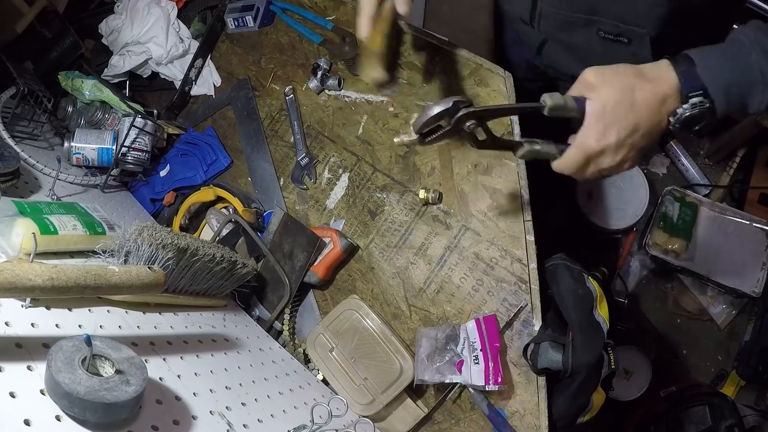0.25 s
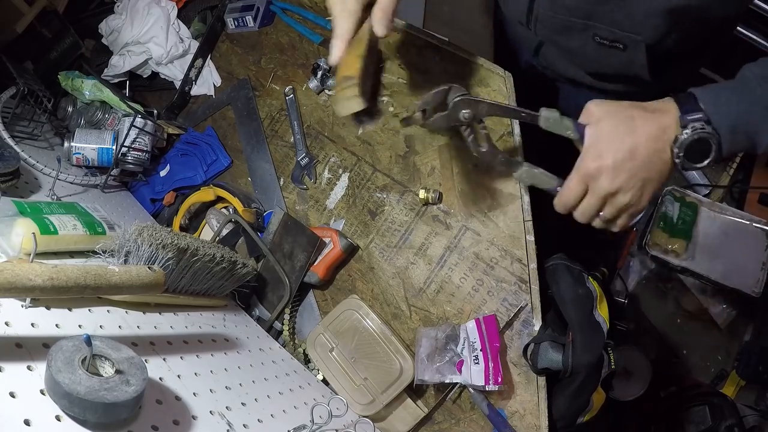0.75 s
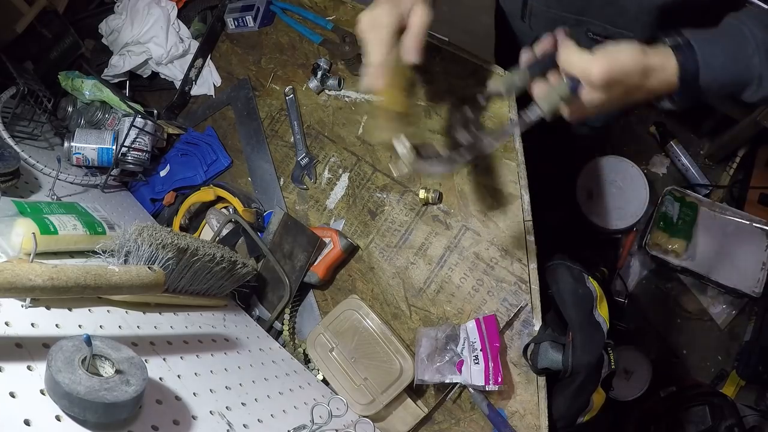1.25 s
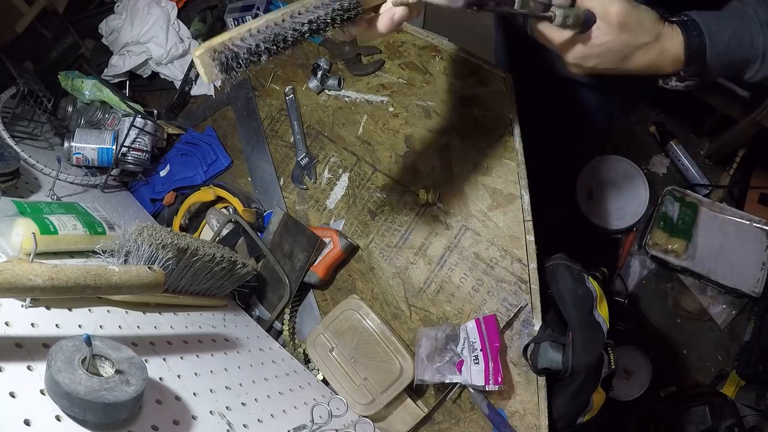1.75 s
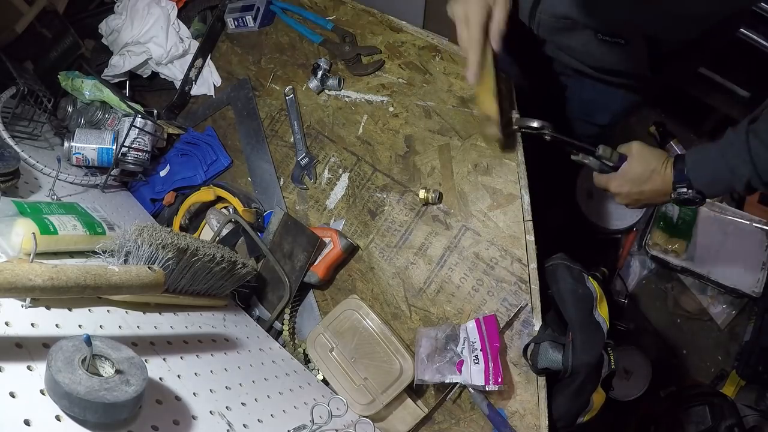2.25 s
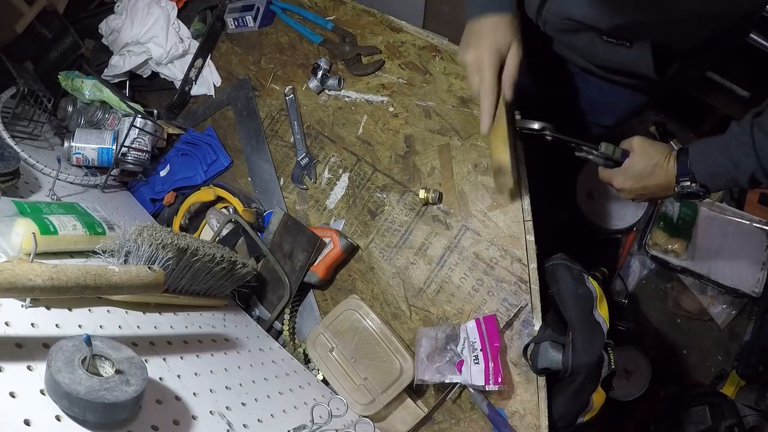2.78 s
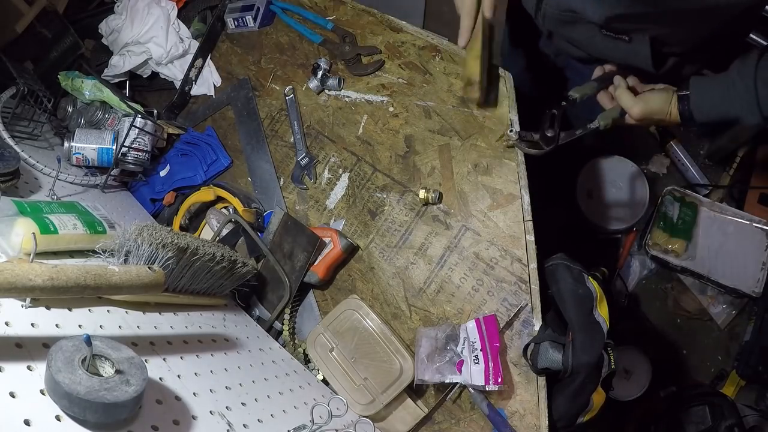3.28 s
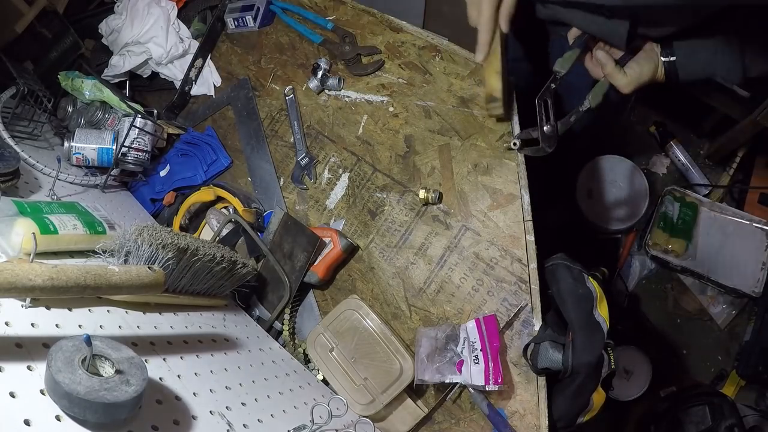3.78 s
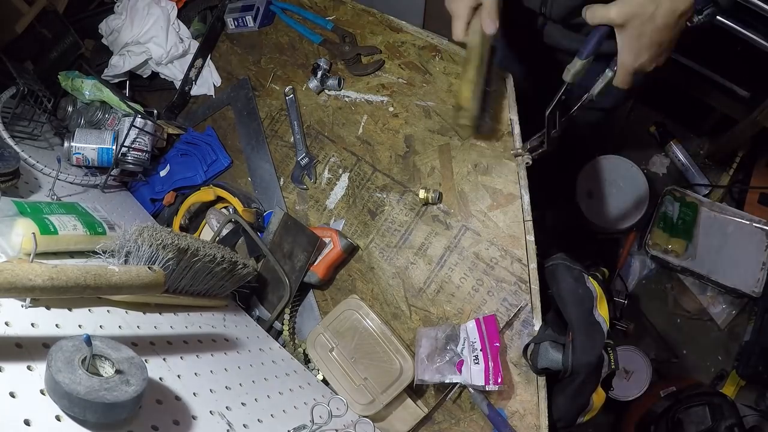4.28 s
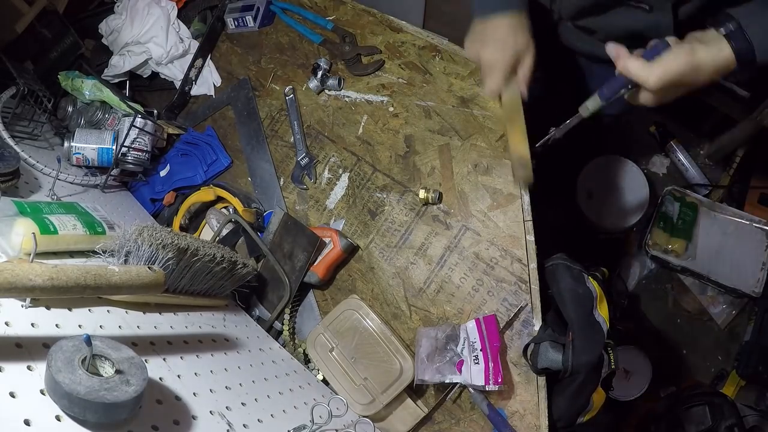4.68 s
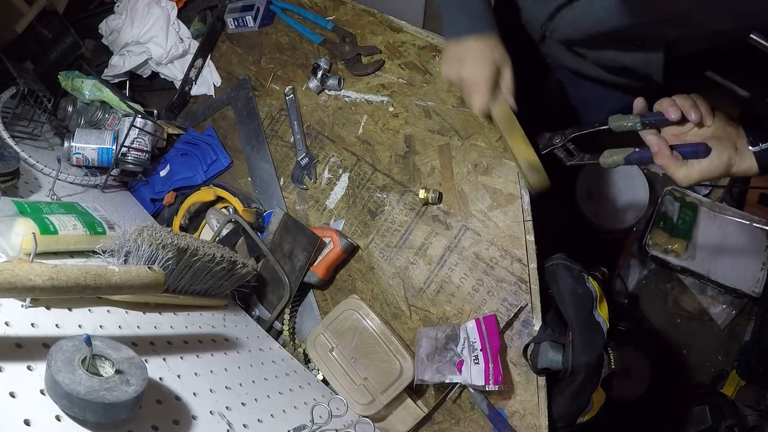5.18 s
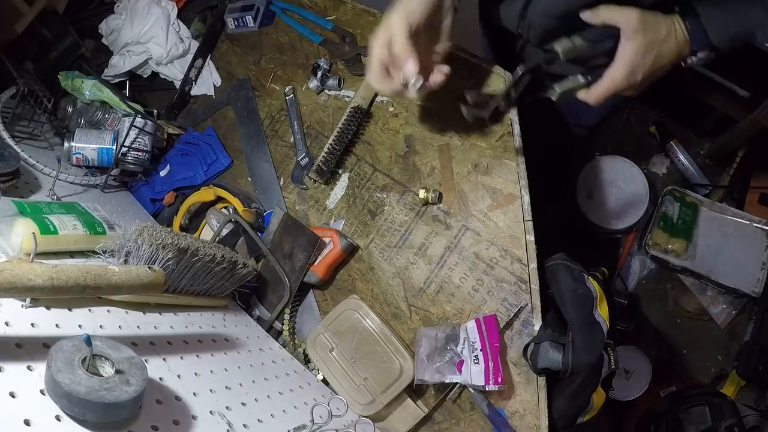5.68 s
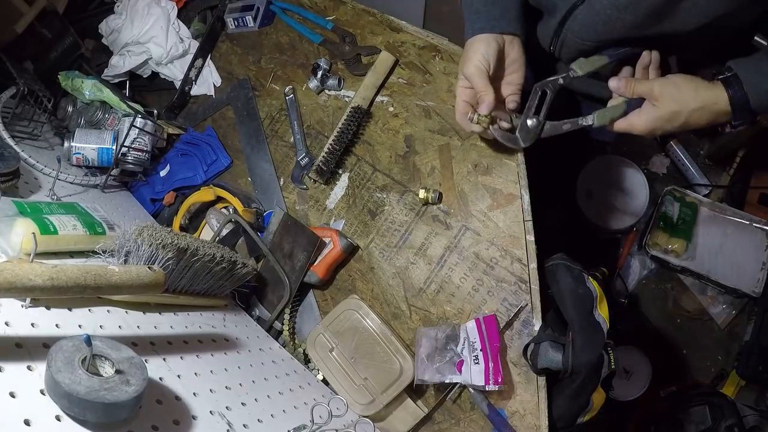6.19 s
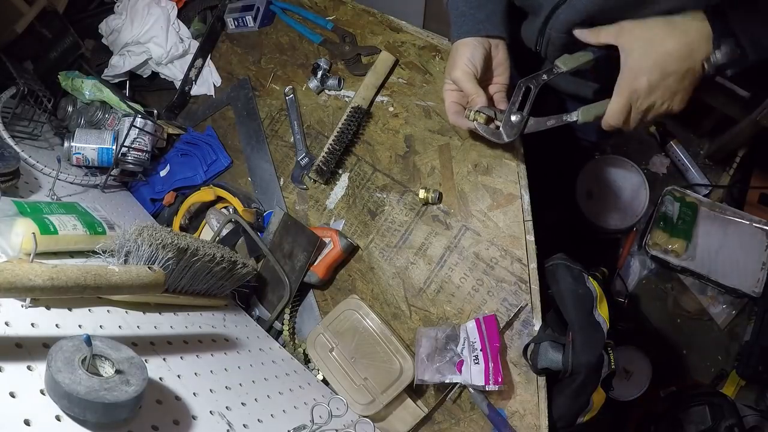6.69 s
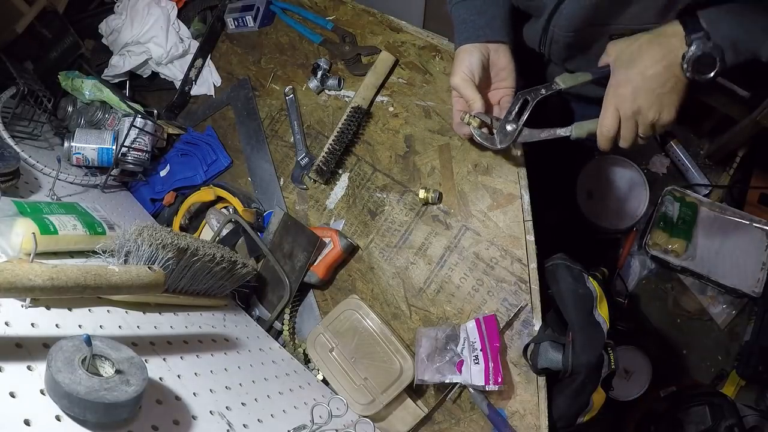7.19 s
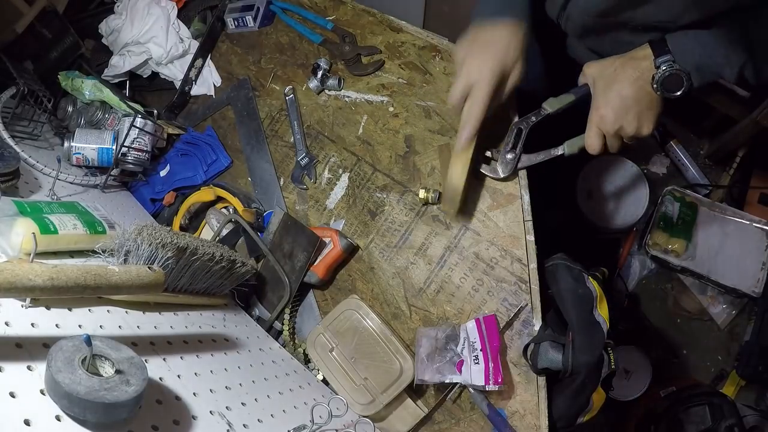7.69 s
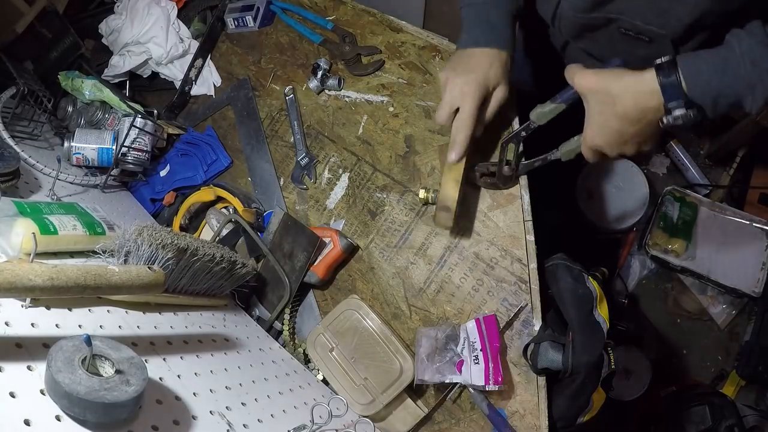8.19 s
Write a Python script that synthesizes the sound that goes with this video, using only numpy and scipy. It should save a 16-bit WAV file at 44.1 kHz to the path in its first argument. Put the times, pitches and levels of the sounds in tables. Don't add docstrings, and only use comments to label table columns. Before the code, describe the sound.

From 0 to 1.6 seconds a wire brush scrubs a small threaded fitting held in pliers in the air: about twenty short, bright rasps, with thin high ringing, a few sharp ticks and a faint joint squeak. A quiet gap follows, with low hum. At 2.3 a knock lands on the wooden bench, and rapid scrubbing runs to 3.1, fuller and woodier. From 3.2 to 4 longer strokes dig in with snapping cracks and low thumps. After a short shuffle and squeaks, even strokes go from 4.4 to 5.3, each thudding the bench, ending in hard knocks near 5.5. From 5.6 to 7 there are soft plier clicks, small squeaks, sleeve rustle and low droning hum. A loud bang at 7.4 leads to lighter scrubbing from 7.7, closing on a heavy thump at 8.4. Close, dry, mono, over quiet room tone.

```python
import sys
import numpy as np
from scipy import signal
from scipy.fft import rfft, irfft, next_fast_len
from scipy.io import wavfile
from scipy.ndimage import uniform_filter1d, map_coordinates

SR = 44100
rng = np.random.default_rng(int(sys.argv[2]) if len(sys.argv) > 2 else 0)


def volts_from_decibels(level):
    exponent = np.asarray(level, float) / 20
    return 10 ** exponent


def wrap_up_sound(samples):
    columns = np.atleast_2d(samples).T
    tamed = np.clip(columns, -1, 1)
    steps = np.round(tamed * 32767).astype(np.int16)
    wavfile.write(sys.argv[1], SR, steps)


N = 372644


def unit(x):
    return x / np.sqrt(np.mean(x ** 2) + 1e-20)


def noise():
    return rng.standard_normal(N)


def add(out, s, piece):
    part = out[round(s * SR):][:len(piece)]
    part += piece[:len(part)]


def curves(rows):
    s, *cols = np.transpose(rows)
    return [np.interp(np.arange(N) / SR, s, c) for c in cols]


def bells(rows):
    t = np.arange(N) / SR
    return sum(height * np.exp(-((t - s) / width) ** 2) for s, width, height in rows)


def wobble(rate):
    knots = rng.standard_normal(int(N * rate / SR) + 4)
    return 2 * np.tanh(map_coordinates(knots, [np.arange(N) * rate / SR]) / 2)


def filtered(x, response):
    m = next_fast_len(N + 8192)
    h = response(np.fft.rfftfreq(m, 1 / SR))
    h = h / np.sqrt(np.mean(np.abs(h) ** 2))
    return irfft(rfft(x, m) * h, m)[:N]


def modes(table):
    def response(f):
        total = 0
        for k, (hz, width, db) in enumerate(table):
            total = total + (-1) ** k * volts_from_decibels(db) * 1j * f * width / (hz * hz - f * f + 1j * f * width)
        return total
    return response


def small_modes(table, pitch=1):
    return lambda f: modes(table)(f / pitch) * f ** 2 / (f ** 2 + 750 ** 2)


def colour(points):
    hz, db = np.transpose(points)
    return lambda f: volts_from_decibels(np.interp(np.log(f + 1), np.log(hz), db))


def burst(hz, t, shape, sharp):
    b, a = signal.iirpeak(hz, max(sharp, np.pi * hz / SR), SR)
    grain = unit(signal.lfilter(b, a, rng.standard_normal(len(t))))
    return signal.lfilter(b, a, grain * shape)


def ticks(per_s, spread_db, hiss):
    hit = rng.random(N) < per_s / SR
    size = volts_from_decibels(spread_db * np.minimum(rng.exponential(1, N), 3)) * noise()
    return unit(unit(hit * size) + hiss * noise())


def still_air():
    # (f/Hz, level/dB per Hz)
    room_tone = [(100, -9), (200, 0.5), (300, -6.5), (800, -21), (1600, -23.5), (4000, -26.5),
                 (8000, -34.5), (15500, -40)]
    air = filtered(noise(), colour([(40, -53), *room_tone, (16500, -80)]))
    return volts_from_decibels(-60.5 + 0.15 * wobble(2.98)) * air


def sleeve():
    # (t/s, width/s, rise/dB)
    rustles = [
        (5.78, 0.34, 9),
        (6.7, 0.3, 8.5),
        (7.33, 0.11, 12.5),
    ]
    return volts_from_decibels(-74 + bells(rustles) + 0.72 * wobble(28)) * filtered(noise(), modes([(795, 310, -.5)]))


def bench_sway():
    # (t/s, sway/dB)
    lean = [(0, -51), (1.9, -49), (2.1, -56), (2.3, -40), (2.7, -38), (3.2, -39.5), (3.7, -32), (4.15, -39),
            (4.6, -37), (5.35, -37), (5.6, -44.5), (6.55, -48.5), (7.1, -49), (7.5, -37), (8.1, -41.5),
            (8.44, -40)]
    # (t/s, width/s, rise/dB)
    hum_swells = [
        (4.7, 0.35, 13),
        (6.55, 0.28, 6),
        (8.1, 0.16, 5),
    ]
    # (f/Hz, width/Hz, level/dB)
    hum_modes = [(62.2, 14, -3), (80, 13.5, -0.5), (97.5, 12.4, 0), (134.3, 21, -5)]
    hum_rest_db, hum_follows = -52.5, 0.37
    deep_db, = curves(lean)
    hum_db = hum_rest_db + hum_follows * (deep_db - lean[0][1]) + bells(hum_swells)
    deep = filtered(noise(), colour([(12, -12.5), (28, -2.0), (38, -12.0), (48, -1.0), (62, -8.5),
                                     (90, -35), (200, -100)]))
    hum = filtered(noise(), lambda f: sum(modes([m])(f) ** 2 for m in hum_modes))
    sway_db = 2.24 * wobble(6)
    return volts_from_decibels(deep_db + sway_db) * deep + volts_from_decibels(hum_db + sway_db) * hum


def low_drones():
    # (t/s, width/s, f/Hz, level/dB)
    drone_rows = [(1.02, 0.075, 204, -57.5), (1.33, 0.15, 95, -51), (.32, 0.063, 91.6, -50),
                  (2.08, 0.12, 101, -44.5), (6.55, 0.15, 94, -48.5), (6.72, 0.19, 80, -45),
                  (1.7, 0.15, 97.5, -50.5), (6.379, 0.08, 190, -61), (6.48, 0.13, 134, -50.5),
                  (6.649, 0.11, 162, -56)]
    out = np.zeros(N)
    for s, width, hz, db in drone_rows:
        t = np.arange(-2 * width, 2 * width, 1 / SR)
        swell = np.exp(-(t / width) ** 2)
        add(out, s + t[0], volts_from_decibels(db) * np.sqrt(2) * swell * np.sin(2 * np.pi * hz * t))
    return out


def pliers_joint():
    # (start t/s, length/s, first f/Hz, last f/Hz, level/dB)
    squeaks = [(0.412, 0.051, 920, 904, -52.5), (1.363, 0.049, 920, 880, -54.5),
               (2.044, 0.054, 830, 680, -59), (2.12, 0.054, 773, 886, -54.5),
               (4.217, 0.045, 946, 960, -52.5), (4.277, 0.055, 870, 880, -50),
               (5.134, 0.043, 870, 880, -49), (6.068, 0.052, 846, 886, -56), (6.872, 0.03, 914, 904, -51),
               (7.273, 0.0249, 1160, 830, -56), (7.33, 0.031, 764, 1000, -48),
               (8.276, 0.031, 935, 896, -48.5)]
    # (start t/s, length/s, first f/Hz, last f/Hz, level/dB)
    whines = [(2.6, 0.067, 2750, 2700, -62), (6.165, 0.0155, 2100, 2600, -57.5),
              (5.335, 0.026, 500, 520, -54), (7.45, 0.11, 700, 670, -56), (8, .016, 2300, 1740, -56),
              (7.512, 0.032, 3300, 3600, -62.5)]
    squeak_blur, whine_blur = 0.084, 0.014
    jaw_hz, jaw_pull = 1730, 0.6
    slides = [(*row, -9.5 - 0.66 * (row[-1] + 53), squeak_blur) for row in squeaks]
    slides += [(*row, -23, whine_blur) for row in whines]
    out = np.zeros(N)
    drift, flutter = wobble(400), wobble(140)
    for s, length, hz0, hz1, db, octave_db, blur in slides:
        start = round(s * SR)
        at = slice(start, start + round(length * SR))
        u = np.linspace(0, 1, at.stop - at.start)
        hz = hz0 + (hz1 - hz0) * u
        octave_hz = 2 * hz + jaw_pull * (jaw_hz - 2 * hz)
        jittered_hz = np.array([hz, octave_hz]) * (1 + blur * drift[at])
        turn, upper = 2 * np.pi * np.cumsum(jittered_hz, axis=1) / SR
        tone = np.sin(turn) + volts_from_decibels(octave_db) * np.sin(upper) + volts_from_decibels(octave_db - 10.0) * np.sin(3 * turn)
        add(out, s, np.sin(np.pi * u) ** 0.24 * volts_from_decibels(db + 3.7 * flutter[at]) * tone)
    return out


def pliers_jaws():
    # (t/s, peak/dB, centre f/Hz, drag/s)
    clicks = [(5.622, -49.5, 3030, 0.017), (5.712, -56, 3200, .012), (5.8837, -50.5, 1730, .006),
              (5.977, -41.5, 4000, 0.0079), (6.157, -47, 5500, .005), (6.272, -46, 2480, 0.0055),
              (6.3135, -46, 4130, .006), (6.4072, -43.5, 2610, 0.0097), (6.535, -51, 3300, .012),
              (6.5854, -37, 4060, 0.011), (6.982, -48, 2800, 0.0074)]
    # (t/s, width/s, level/dB)
    scrapes = [(2.24, .02, -61.5), (4.095, 0.083, -55), (5.78, 0.043, -67), (6.095, 0.028, -65),
               (6.172, 0.013, -59.5), (6.42, 0.01, -59), (6.605, .012, -65), (7.35, 0.01, -61)]
    click, t = np.zeros(N), np.arange(SR // 12) / SR
    for s, db, hz, drag_s in clicks:
        shape = t / 0.002 * np.exp(1 - t / 0.0019) + 0.48 * np.exp(-(t / drag_s) ** 2)
        body = burst(hz, t, shape, sharp=6.1) + 1.88 * burst(3450, t, shape, sharp=0.63)
        add(click, s, volts_from_decibels(db - 13.5) * body)
    slide = bells([(s, width, volts_from_decibels(db)) for s, width, db in scrapes])
    scrape = filtered(slide * ticks(1500, 3, hiss=1.9), colour([(900, -21), (2000, 1), (4500, -4.0),
                                                                (6500, -4.5), (8500, -17), (12000, -26)]))
    b, a = signal.butter(4, 7000, fs=SR)
    return 0.7 * signal.lfilter(b, a, click) + 0.17 * click + 0.65 * scrape


def bench_blows(rise_s=0.0019, fall_s=0.0035):
    # (t/s, peak/dB, push 1 or pull -1)
    knocks = [(2.2816, -12, -1), (3.6343, -20, 1), (3.7876, -28, -1), (3.849, -21, 1), (3.8785, -22.5, 1),
              (3.948, -31, 1), (4.321, -18.5, -1), (4.38, -18, 1), (4.7132, -17, -1), (4.817, -20, 1),
              (4.9844, -19, 1), (5.0728, -16.5, 1), (5.4946, -10.5, -1), (5.509, -23, 1), (5.512, -16, 1),
              (7.4131, -18, 1), (7.869, -26, -1), (8.005, -21, 1), (8.112, -21, 1), (8.3557, -14.5, 1)]
    # (t/s, peak/dB, f/Hz, push 1 or pull -1)
    thuds = [(0.509, -45.5, 270, 1), (0.886, -45.5, 264, 1), (.995, -44, 327, 1), (1.104, -41, 265, 1),
             (2.2775, -22, 185, -1), (2.372, -23.5, 111, 1), (2.536, -26.5, 90, -1), (2.803, -34, 80, 1),
             (3.259, -25, 88, 1), (3.484, -22, 97, 1), (3.545, -23.5, 120, -1), (3.585, -20.5, 105, 1),
             (3.733, -26.5, 91, 1), (3.833, -24, 80, 1), (3.932, -23, 100, 1), (4.01, -26, 100, -1),
             (4.035, -31, 167, 1), (4.2508, -18.5, 84.5, 1), (4.569, -23, 80, 1), (4.6767, -16.5, 132, 1),
             (4.76, -20, 120, 1), (4.784, -18, 135, 1), (4.812, -23.5, 198, 1), (4.885, -14.5, 145, 1),
             (5.066, -21.5, 196, 1), (5.277, -16.5, 134, -1), (5.297, -28, 120, 1), (5.4185, -16.5, 152, 1),
             (7.4144, -12.5, 195, -1), (7.4197, -20, 202, -1), (7.619, -27.5, 172, 1), (7.95, -24, 150, -1),
             (8.024, -22, 131, 1), (8.043, -21, 138, 1), (8.4378, -7, 121, 1)]
    knock_hz, hard_db, stiffen_hz_per_db = 201.3, -20, 7
    blows = []  # (t/s, peak/dB, sign, f/Hz, clack hardness/dB, time stretch)
    for s, db, sign in knocks:
        blows.append((s, db, sign, knock_hz + stiffen_hz_per_db * max(db - hard_db, 0), db, 1))
    for s, db, hz, sign in thuds:
        blows.append((s, db, sign, hz, db - 27, (knock_hz / hz) ** 0.25))
    out, t = np.zeros(N), np.arange(-SR // 50, SR // 20) / SR
    for s, db, sign, hz, hardness_db, slow in blows:
        shape = np.exp(-np.where(t < 0, (t / rise_s / slow) ** 2, t / fall_s / slow))
        thump = np.sign(sign) * shape * np.cos(2 * np.pi * hz * t)
        clack = volts_from_decibels(1.77 * (hardness_db + 14.5) - 10.5) * burst(428, t, shape ** 0.72, sharp=0.79)
        add(out, s + t[0], volts_from_decibels(db + 1.0) * (thump + clack))
    return out


def handle_raps(ring_s=0.004):
    # (t/s, peak/dB, f/Hz)
    raps = [(2.263, -29.5, 1250), (2.28, -22, 525), (2.872, -38, 1410), (3.317, -33, 1490),
            (3.354, -29, 1026), (3.477, -28.5, 953), (3.54, -31, 1160), (3.579, -29.5, 954),
            (3.579, -30.5, 2460), (3.777, -29, 905), (3.872, -34, 2420), (3.872, -33, 946),
            (3.967, -28.5, 954), (3.967, -38, 2500), (5.066, -33.5, 2270), (5.295, -38, 1280),
            (5.415, -36, 861), (5.477, -26, 1400), (5.482, -22, 1060), (5.492, -18.5, 800),
            (7.395, -33, 1190), (7.391, -30, 730), (7.4105, -22, 480), (7.467, -29, 280), (8.351, -40, 810),
            (8.421, -35, 1140), (8.431, -28, 880), (8.433, -20, 390)]
    out, t = np.zeros(N), np.arange(SR // 25) / SR
    shape = (1 - np.exp(-t / 0.0006)) * np.exp(-t / ring_s)
    for s, db, hz in raps:
        add(out, s, volts_from_decibels(db + 2.5) * shape * np.sin(2 * np.pi * hz * t * (1 - 3 * t)))
    return out


def bowed_rings(length_s=0.027):
    # (start t/s, f/Hz, level/dB)
    bowed = [(0.246, 3600, -42.5), (.536, 3500, -44), (.866, 3430, -38.5), (.985, 3520, -46),
             (1.087, 5400, -47), (1.201, 3260, -42), (1.321, 3560, -44), (1.423, 3400, -37.5),
             (1.513, 3420, -37.5), (2.559, 3420, -43), (2.628, 3300, -46), (3.422, 3450, -43.5),
             (3.529, 3330, -41), (3.569, 5370, -43), (3.72, 3400, -43), (3.817, 3340, -34.5),
             (3.923, 3550, -44.5), (3.445, 4500, -54), (3.655, 5500, -49), (3.67, 4470, -47),
             (3.72, 2900, -45), (3.835, 4160, -46), (2.346, 5560, -55), (4.47, 5300, -45.5),
             (4.555, 4300, -49), (4.581, 5850, -49), (5.16, 5450, -58), (4.659, 3080, -45),
             (4.68, 5450, -44), (4.785, 5500, -47), (4.869, 5440, -39.5), (4.897, 5450, -50),
             (5.261, 5570, -47), (7.835, 3520, -40.5), (7.995, 3430, -42.5), (8.018, 3510, -42),
             (8.014, 5800, -50), (8.168, 3420, -45), (8.31, 3470, -46.5)]
    out, t = np.zeros(N + SR), np.arange(SR // 10) / SR
    shape = np.sin(np.pi * np.clip(t / length_s, 0, 1)) ** 0.71
    for s, hz, db in bowed:
        add(out, s, volts_from_decibels(db) * burst(hz, t, shape, sharp=13.6))
    return out[:N]


def wire_snags():
    # (t/s, peak/dB, centre f/Hz)
    snags = [(0.507, -21.5, 4030), (0.894, -19, 3780), (0.993, -24, 3730), (1.529, -17, 3100),
             (2.279, -14, 1200), (2.3697, -18.5, 2120), (2.873, -13.5, 2300), (3.319, -22, 1920),
             (3.3555, -11, 2120), (3.4792, -12, 2430), (3.543, -27, 2000), (3.7789, -13, 2130),
             (3.8723, -15.5, 2500), (3.9677, -15, 2040), (4.149, -40, 7500), (4.272, -36, 4000),
             (4.372, -36, 4760), (4.463, -17, 2480), (4.6708, -14.5, 2950), (4.7074, -13, 1960),
             (4.7662, -16, 2050), (4.8776, -13.5, 2720), (4.982, -21, 2150), (5.188, -17.5, 2430),
             (5.274, -20, 1980), (5.417, -21.5, 2800), (5.468, -23, 2200), (5.484, -18, 3000),
             (5.4926, -16, 1100), (7.412, -4, 760), (8, -31, 3000), (8.105, -23, 2500),
             (8.3522, -16.5, 3200), (8.4317, -12.5, 2500)]
    out, t = np.zeros(N), np.arange(SR // 40) / SR
    for s, db, hz in snags:
        tick = volts_from_decibels(-22.0) * burst(7100, t, np.exp(-t / 0.0017), sharp=0.29)
        crack = burst(hz, t, t / 0.0014 * np.exp(1 - t / 0.00099), sharp=1.0)
        add(out, s - .0012, volts_from_decibels(db - 12.5) * (crack + tick))
    return out


def contacts():
    in_air = [(0.019, 0.034, -45, 0, -2), (0.105, 0.028, -43, -7, -1), (0.144, 0.038, -43.5, 4, -0.5),
              (0.244, 0.027, -46, -11, -3), (0.28, 0.029, -41.5, 0, -1.0), (0.378, 0.017, -43.5, 2, 0.5),
              (0.405, 0.038, -43, 3, -4.5), (0.497, 0.022, -43, 6, 1.5), (0.529, 0.04, -41, 3.5, -7),
              (0.617, 0.035, -43.5, 4, -2.5), (0.658, 0.035, -41, 2, 0.0), (0.768, 0.051, -43.5, 6, 6),
              (0.876, 0.038, -41.5, 4, 14), (0.977, 0.04, -39.5, 4, 9), (1.089, 0.032, -40, 5.5, -5),
              (1.126, 0.023, -47, 4, 0.0), (1.209, 0.03, -40, 1, -4), (1.321, 0.031, -41.0, 5, 2),
              (1.42, 0.039, -41.5, 5.5, 10), (1.518, 0.04, -41.5, 5.5, 0.0)]
    # (t/s, length/s, dB, dB, dB)
    quick = [(2.398, 0.035, -47, 4, 2.5), (2.441, 0.032, -42.5, 1, 0.5), (2.482, 0.033, -46, 1.5, 1),
             (2.523, 0.037, -44.5, 0, 1.5), (2.566, 0.032, -46, 4.5, 1.5), (2.603, 0.053, -42, 1, 0.5),
             (2.653, 0.035, -42.5, 3, 0), (2.698, 0.056, -45, 2, 1), (2.75, 0.045, -39, -2.5, 0.5),
             (2.862, 0.035, -41, 4, 3), (2.907, 0.05, -37.5, -1.5, -2), (3.015, 0.043, -37.5, -0.5, 0.5),
             (3.055, 0.061, -39, -4, -0.5)]
    # (t/s, length/s, dB, dB, dB)
    digging = [(3.209, 0.051, -46.5, -0.5, 1), (3.275, 0.025, -46.5, 2, -4.5),
               (3.307, 0.065, -39, -0.5, -4.5), (3.425, 0.069, -38, 3, 2), (3.55, 0.043, -37.5, 1.5, -3),
               (3.615, 0.038, -45, 3.5, 4.5), (3.645, 0.049, -35.5, -1, -4), (3.72, 0.069, -43.5, 0, 0.5),
               (3.774, 0.006, -39, 6, -4), (3.821, 0.053, -42, -2, 1), (3.859, 0.03, -45, 4, -2),
               (3.928, 0.057, -41, 1, 2)]
    # (t/s, length/s, dB, dB, dB)
    even = [(4.443, 0.068, -47.5, 2, 1.5), (4.557, 0.059, -42.5, 0, -0.5), (4.657, 0.063, -44, 1.5, -4.5),
            (4.756, 0.02, -45.5, 4.5, 2.5), (4.776, 0.044, -42.5, 0.5, 1.5), (4.861, 0.062, -45, 2.5, 0.5),
            (4.967, 0.057, -42.5, 1, -1.5), (5.06, 0.064, -44, 2, -1.5), (5.163, 0.062, -42.5, 0, -1),
            (5.262, 0.058, -41.5, 0.5, 2)]
    # (t/s, length/s, dB, dB, dB)
    regripped = [(7.659, 0.043, -52, 2, -3.5), (7.705, 0.054, -43.5, 1.5, 3.5),
                 (7.765, 0.056, -45.5, 5, 3.5), (7.822, 0.052, -42, -1, 2), (7.941, 0.033, -44.5, 0.5, -1),
                 (7.992, 0.051, -45, 4, 1), (8.1, 0.034, -44, 2, 5.5), (8.147, 0.046, -41.5, 0, -1),
                 (8.245, 0.05, -48, -3, 0), (8.306, 0.051, -43, 0.5, -8)]
    # (fitting/dB, jaw/dB, wire fizz/dB, handle/dB, bench/dB)
    grips = [
        (-2.5, -11, -0.5, -11.5, -25),
        (-3.5, -12.5, -4, 4, 8),
        (-7, -10, -4, 3, 10.5),
        (-3.5, -6.5, -2, 7, 13.5),
        (-3, -11, 0.5, -3.5, 14),
    ]
    press_at = [0.48, 0.38, 0.89, 0.59, 0.47, 0.71]
    # (start t/s, length/s, bristle/dB, handle/dB, bench/dB)
    bumps = [(2.258, 0.024, -65, -39, -26), (2.354, 0.031, -50, -39.5, -31),
             (3.527, 0.028, -51, -33, -24.5), (4, 0.2, -56, -53, -53), (3.992, 0.064, -60, -48, -36.5),
             (4.235, 0.081, -66, -54, -38), (4.319, 0.029, -58, -44, -27),
             (4.361, 0.018, -57, -39.5, -24.5), (5.408, 0.028, -51, -38.5, -28.5),
             (5.433, 0.034, -59, -46.5, -41), (5.471, 0.034, -51, -27.5, -23),
             (7.393, 0.026, -45, -35.5, -24), (7.459, 0.042, -60.5, -51, -32.5),
             (7.485, 0.1, -61, -56, -42), (7.607, 0.036, -58.5, -55, -40),
             (8.341, 0.015, -42.5, -39, -24.5), (8.416, 0.033, -37.5, -33, -18)]
    # (fitting/dB, jaw/dB, wire fizz/dB)
    bump_grip = (-5.5, -8, -1.9)
    usual_db = -42
    follows = np.array([1, 1, 1, 0.94, 0.56])
    rows = []
    for s, length, db, handle_db, bench_db in bumps:
        rows.append((s, length, press_at[-1], *np.add(db, bump_grip), handle_db, bench_db))
    for bout, grip, place in zip([in_air, quick, digging, even, regripped], grips, press_at):
        for s, length, db, handle_db, bench_db in bout:
            extra_db = np.array([0, 0, 0, handle_db, bench_db])
            levels_db = usual_db + follows * (db - usual_db) + np.array(grip) + extra_db
            rows.append((s, length, place, *levels_db))
    return np.array(rows)


def pressure(rows, level_db, early, sag_db=9, lift_s=0.0065):
    out, t = np.zeros(N), np.arange(-SR // 20, SR // 3) / SR
    for (s, length, place, *_), db in zip(rows, level_db):
        top = np.clip(place - early, .1, .9) * length
        away = np.where(t < top, (top - t) / top, (t - top) / (length - top))
        outside = np.maximum(np.maximum(-t, t - length), 0)
        lift_db = 10 * outside / np.where(t < 0, 0.67 * lift_s, lift_s)
        shape = volts_from_decibels(db - sag_db * np.minimum(away, 1) ** 1.46 - lift_db)
        at = np.clip(np.round((s + t) * SR).astype(int), 0, N - 1)
        out[at] = np.maximum(out[at], shape)
    return out


def gripped(drive, table):
    # (t/s, slackness 0-1)
    squeeze = [
        (0, 0.14),
        (3.9, 0.14),
        (4.5, 0.64),
        (5.3, 0.4),
        (7.6, 0.13),
    ]
    slack = np.clip(curves(squeeze)[0] + 0.13 * wobble(11), 0, 1)
    tight_ring = filtered(drive * np.sqrt(1 - slack), small_modes(table))
    return tight_ring + filtered(drive * np.sqrt(slack), small_modes(table, pitch=0.913))


def shifting(x, depth_db):
    z = signal.stft(x, nperseg=256)[2]
    field = uniform_filter1d(rng.standard_normal(z.shape), size=3, axis=0)
    field = uniform_filter1d(field, size=9, axis=1)
    return signal.istft(z * volts_from_decibels(depth_db * unit(field)), nperseg=256)[1][:N]


def brush():
    # (f/Hz, level/dB per Hz)
    wires = [(800, -14), (1500, 2), (2800, -1), (5000, 5.5), (6500, -7), (7200, -19.5), (10500, -9),
             (15500, -12)]
    # (f/Hz, width/Hz, level/dB)
    fitting = [(3400, 375, 2), (3610, 215, 4), (4230, 250, -7.5)]
    # (f/Hz, width/Hz, level/dB)
    jaws = [(5450, 260, -1), (6340, 550, -9)]
    # (f/Hz, width/Hz, level/dB)
    tips = [(7670, 630, -3), (9600, 660, 2), (13900, 1200, -8)]
    # (f/Hz, width/Hz, level/dB)
    handle = [(880, 140, 6.5), (1135, 303, 10.5), (1487, 230, 10), (2013, 170, 6), (2860, 920, -1.5)]
    # (f/Hz, width/Hz, level/dB)
    bench = [(37.6, 17.3, 2), (61.3, 48, 1.5), (146.4, 117, 0), (194.8, 95.5, 1), (700, 340, -20.5)]
    rows = contacts()
    *_, ring_db, jaw_db, fizz_db, handle_db, bench_db = rows.T
    tufts_db = 1.9 * wobble(90)

    press = pressure(rows, fizz_db, early=0.007, sag_db=10.5) * volts_from_decibels(tufts_db - 5.5)
    metal = filtered(press * ticks(9000, 1.7, hiss=2.1), colour(wires))
    press = pressure(rows, ring_db, early=0.052) * volts_from_decibels(tufts_db + 1.5 * wobble(40))
    metal += gripped(press * ticks(2500, 5.1, hiss=0.64), fitting)
    press = pressure(rows, jaw_db, early=0.007) * volts_from_decibels(tufts_db + 2.6 * wobble(31))
    metal += filtered(press * ticks(2500, 8.0, hiss=0.89), small_modes(jaws))
    press = pressure(rows, fizz_db, early=0.046, sag_db=11.0) * volts_from_decibels(tufts_db + 1.2 * wobble(18) - 13)
    metal += filtered(press * ticks(900, 3.1, hiss=1.2), modes(tips))

    press = pressure(rows, handle_db, early=0.3) * volts_from_decibels(tufts_db + 1.55 * wobble(60) - 5.5)
    wood = filtered(press * ticks(1500, 3.0, hiss=1.48), small_modes(handle))
    press = pressure(rows, bench_db, early=0.24) * volts_from_decibels(3.07 * wobble(50) - 2.5)
    wood += filtered(press * ticks(400, 0.9, hiss=0.96), modes(bench))
    return shifting(metal, depth_db=2.0) + wood


def scene():
    floor = still_air() + sleeve() + bench_sway() + low_drones()
    pliers = pliers_joint() + pliers_jaws()
    strikes = bench_blows() + handle_raps()
    scrubbing = bowed_rings() + wire_snags() + brush()
    return (floor + pliers + strikes + scrubbing)[None]


def roll_off(x):
    return signal.sosfilt(signal.butter(12, 15690, fs=SR, output="sos"), x)


def record(dry):
    held = dry / (1 + np.abs(dry / .38) ** 4) ** .25
    b, a = signal.ellip(8, .5, 60, 15450, fs=SR)
    limited = signal.lfilter(b, a, signal.lfilter(b, a, held))
    return roll_off(limited)


dry = scene()
out = record(dry)
wrap_up_sound(out)
```